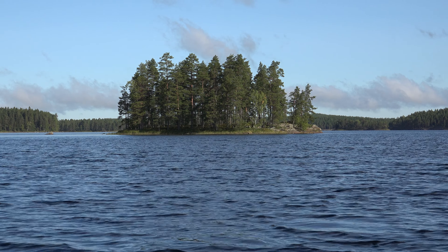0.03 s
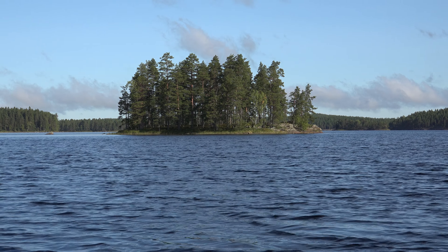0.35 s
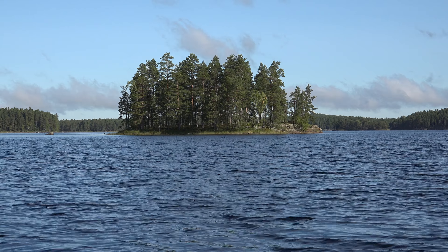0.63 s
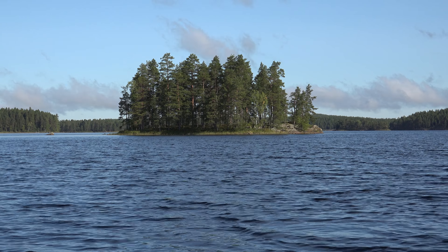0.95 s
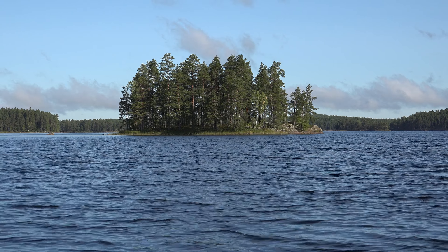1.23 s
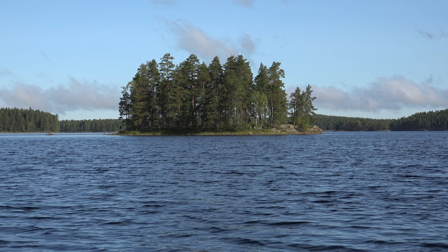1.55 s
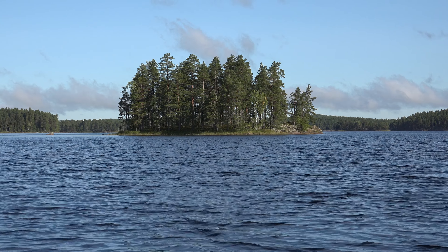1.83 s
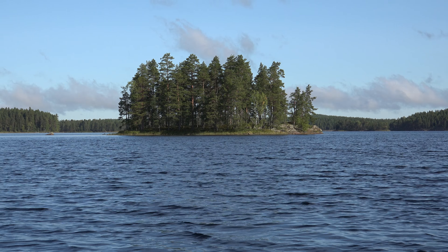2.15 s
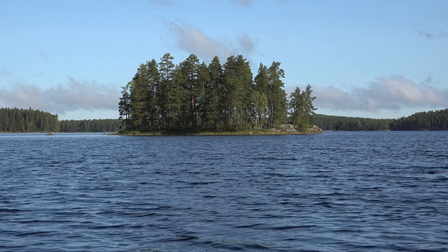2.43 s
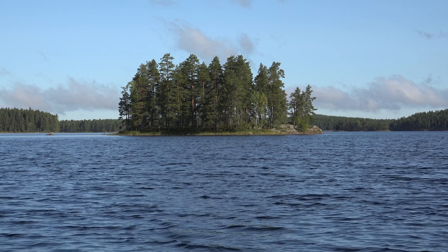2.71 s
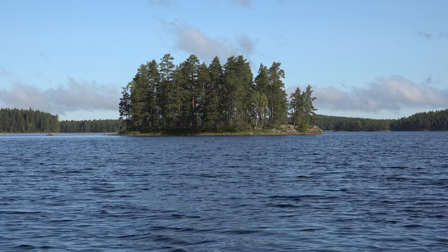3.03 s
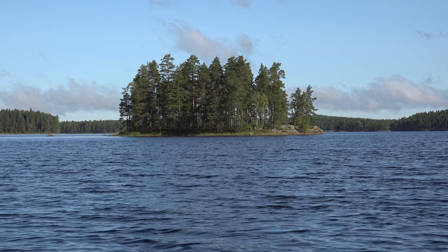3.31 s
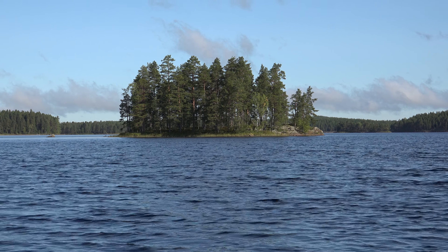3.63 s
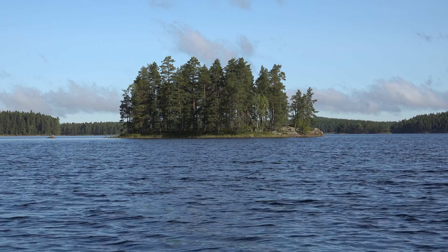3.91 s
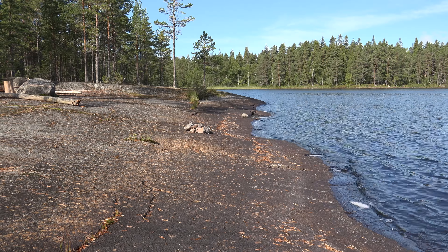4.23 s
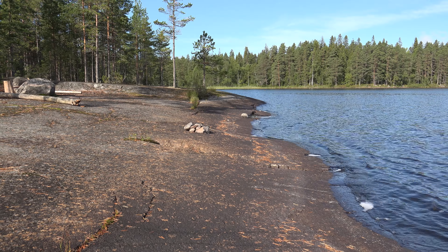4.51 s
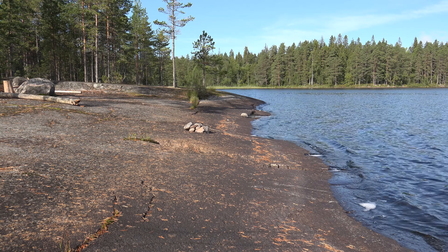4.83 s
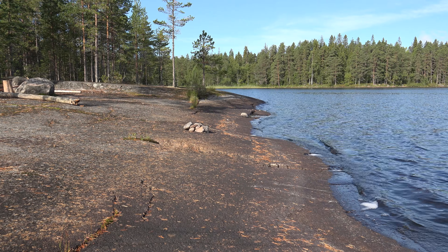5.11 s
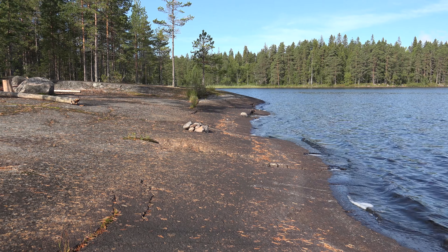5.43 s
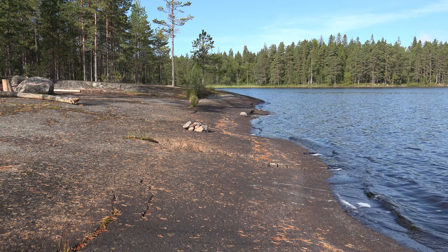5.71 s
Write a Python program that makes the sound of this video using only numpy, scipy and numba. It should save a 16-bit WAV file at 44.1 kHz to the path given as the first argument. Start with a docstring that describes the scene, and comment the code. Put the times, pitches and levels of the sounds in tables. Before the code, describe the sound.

Small waves lap against a rocky lake shore throughout, close to the microphone and slightly to the right. Each brings a bubbly gurgle, short slaps, rising glugs and a fine fizz of spray with occasional droplets. Wind rumbles and flutters on the microphone, leaning left, strongest in the first second and gusting again around 2.5 and 3.7 seconds. A faint, steady rush of open water lies behind. Distinct slaps come near 1.4, 2 and 2.7 seconds, with a run of glugs from 3.3 to 3.6 seconds. At about 4 seconds the sound shifts to a sheltered cove, where the wind becomes weaker and deeper and trees hiss faintly. The fullest splashing and gurgling comes between 4.1 and 4.6 seconds. A low glug follows at 4.8 and a small slap at 5.2, then a softer, hissier wash continues until about 6 seconds.

```python
"""Small waves lap on the bare rock shore of a lake, a little to the right of a stereo camera microphone.
Each wave traps air, which resonates: pockets slap and glide upward, small bubbles gurgle, spray crackles.
Wind eddies buffet the microphone ports over the faint rush of the lake. Near 4 s the scene changes
to a sheltered cove among trees, with less wind and a softer, hissier wash."""
import sys
import numpy as np
from scipy import signal
from scipy.fft import rfft, irfft
from scipy.io import wavfile
from scipy.ndimage import uniform_filter1d
from numba import njit

SR = 44100
rng = np.random.default_rng(int(sys.argv[2]) if len(sys.argv) > 2 else 0)


def to_wav(s):
    """Save 16-bit WAV."""
    ch = np.atleast_2d(s).T  # columns
    pcm = np.round(np.clip(ch, -1, 1) * 32767)  # PCM
    wavfile.write(sys.argv[1], SR, pcm.astype(np.int16))


N = 258426

CHANGE_S = 3.955  # from the exposed shore to the sheltered cove
LAG_MS, LAG_SPREAD_MS = 0.052, 0.036  # the right port hears the water first
# Waves running up the rock. Each row: arrival in seconds, time on the rock in seconds,
# relative gurgle level in dB, relative spray level in dB.
WAVES = [(0.018, 0.013, -43, -54), (.3, .38, -43, -57.5), (.8, 0.036, -53, -68), (1.179, .21, -42, -56.5),
         (1.84, 0.18, -42.5, -54), (2.05, 0.078, -50, -57.5), (2.36, 0.14, -52, -62.5),
         (2.609, 0.1, -41.5, -51.5), (2.8, 0.076, -42.5, -57), (3.255, 0.23, -39, -50.5),
         (3.77, 0.36, -42, -53.5), (4.147, 0.23, -39, -45.5), (4.42, 0.09, -40, -53.5),
         (4.6, 0.1, -48, -58), (4.8, 0.09, -40, -54.5), (4.96, 0.17, -46, -53.5), (5.16, .13, -42.5, -58.5),
         (5.37, 0.076, -47.5, -57), (5.5, 0.1, -47, -62), (5.82, 0.037, -48.5, -53)]


def undb(db):
    """Amplitude grows tenfold for every 20 dB."""
    return 10 ** (np.asarray(db) / 20)


def level(x, db=0):
    """Normalisation sets the rms level of the mean of both channels."""
    return x * undb(db) / np.sqrt(np.mean(x.mean(0) ** 2))


def steady(x, seconds):
    """Division by the running rms evens out slow swells; faster flicker stays."""
    power = uniform_filter1d(x.mean(0) ** 2, int(seconds * SR))
    return x / np.sqrt(power + 1e-9 * power.max())


def gain_at(hz, spectrum):
    """Interpolation on a log-frequency axis reads a gain from a spectrum."""
    points, db = np.transpose(spectrum)
    return undb(np.interp(np.log(hz + 1), np.log(points), db))


def by_place(exposed, sheltered):
    """A 10 ms crossfade leads from the exposed shore to the cove."""
    share = np.clip((np.arange(N) / SR - CHANGE_S) / .01 + .5, 0, 1)
    share = np.sin(np.pi / 2 * share) ** 2
    return (1 - share) * np.asarray(exposed) + share * np.asarray(sheltered)


def noise(spectrum, coherence, lag_ms=0):
    """Partly coherent noise: a share of its power is common to both ports, lag_ms later on the left."""
    hz = np.arange(N // 2 + 1) * SR / N
    common, *own = rfft(rng.standard_normal((3, N)))
    delay = np.array([np.exp(-2j * np.pi * hz * lag_ms / 1000), np.ones(len(hz))])
    mixed = np.sqrt(coherence) * common * delay + np.sqrt(1 - coherence) * np.array(own)
    return level(irfft(mixed * gain_at(hz, spectrum), N))


def distant_rush():
    """Many far sources add up to steady noise: first the open lake, then the trees."""
    # Spectra of the lake and the trees. Each row: frequency in Hz, relative density in dB.
    lake = [(100, -49), (400, -6), (1000, 3), (2000, -17), (4000, -21), (8000, -14.5), (12000, -21),
            (16000, -29)]
    trees = [(100, -16), (400, 6.5), (800, -1), (1500, -0.5), (2500, -18), (6000, -5.5), (12000, -7.5),
             (16000, -14)]
    return by_place(noise(lake, coherence=0.49, lag_ms=LAG_MS) * undb(-60.5),
                    noise(trees, coherence=0.59, lag_ms=LAG_MS) * undb(-59))


def wind(flutter_depth=0.14, lee_hz=62, overload=0.88):
    """Turbulent pressure: large eddies rumble at each port, small ones flutter with their pushes."""
    # Spectra of large and small eddies. Each row: frequency in Hz, relative density in dB.
    large_eddies = [(8, -20), (18, 4.5), (30, 1.5), (42, 0.5), (65, -6), (95, -13.5), (140, -30),
                    (250, -98)]
    small_eddies = [(45, -10), (80, 3), (115, 0.5), (180, -6), (260, -14.5), (400, -24), (700, -39),
                    (1500, -60.5)]
    # Gusts in each place. Each row: time in seconds, rumble level in dB, left minus right in dB.
    open_gusts = [(0, -10.5, 4), (.36, -16.5, 5.5), (.55, -12, 3.5), (.67, -19, 3), (.79, -15, 6.5),
                  (1.2, -24.5, 2), (1.6, -24, 7.5), (1.95, -22, 5.5), (2.25, -20.5, 4), (2.5, -14, 3.5),
                  (2.65, -23.5, 6), (3.1, -21.5, 2), (3.33, -17.5, 2), (3.6, -21, 4), (3.74, -15, 4),
                  (3.94, -16.5, 6.5)]
    cove_gusts = [(3.97, -20.5, -1), (4.1, -24.5, 0.5), (4.28, -24, 1.5), (4.54, -36, -1), (4.83, -29, 7.5),
                  (5.02, -28, 3), (5.17, -34.5, -7.5), (5.4, -29, 6.5), (5.7, -26.5, -2.5), (5.86, -30, 0)]
    t = np.arange(N) / SR
    places = map(np.transpose, (open_gusts, cove_gusts))
    courses = [[np.interp(t, s, db), np.interp(t, s, pan)] for s, db, pan in places]
    wind_db, pan_db = by_place(*courses)
    gust_db = wind_db + 19.5
    flutter_db = by_place(-28.5 + 0.31 * gust_db, -46.5 + 0.42 * gust_db)
    eddies = noise(large_eddies, coherence=0.085)
    lee = signal.sosfilt(signal.butter(2, lee_hz, fs=SR, output="sos"), eddies)  # weaker wind is deeper
    rumble = steady(by_place(eddies, lee), seconds=0.1234)
    push = np.abs(rumble.mean(0))
    flutter = steady(noise(small_eddies, coherence=0.85) * (1 + flutter_depth * push), seconds=0.14)
    sides_db = np.array([pan_db, -pan_db]) / 2
    pressure = rumble * undb(wind_db + sides_db) + flutter * undb(flutter_db + 0.63 * sides_db)
    return overload * np.tanh(pressure / overload)  # the microphone rounds off the hardest pushes


def shore_echo(x, t60=0.11, echo_db=-12):
    """Scattering from rock and ripples adds a short, exponentially decaying tail."""
    t = np.arange(SR // 4) / SR
    common, *own = rng.standard_normal((3, len(t)))
    tail = (common + 0.91 * np.array(own)) * np.exp(-np.log(1000) * t / t60)
    tail /= np.sqrt(np.sum(tail ** 2, axis=1, keepdims=True))
    return x + undb(echo_db) * signal.fftconvolve(x, tail, axes=1)[:, :N]


@njit
def ring(start, hz, cycles, size, lag, pan, rise):
    """Damped oscillators swell in about a cycle, then rise in pitch as they decay by 50 dB."""
    out = np.zeros((2, N))
    for k in range(len(start)):
        life = cycles[k] / hz[k]
        for ch in range(2):
            side = .5 - ch
            onset = start[k] + side * lag[k]
            for i in range(max(0, int(onset * SR) + 1), min(N, int((onset + life) * SR))):
                t = i / SR - onset
                swell = (1 - np.exp(-2 * t * hz[k])) ** 2 * np.exp(-5.75 * t / life)
                turns = hz[k] * t * (1 + rise * t / life / 2)
                out[ch, i] += size[k] * (1 + side * pan[k]) * swell * np.sin(2 * np.pi * turns)
    return out


def bubbles(start, hz, cycles, size, rise, scatter=0.88):
    """Bubbles strewn along the waterline each differ in delay and level between the ports."""
    lag_offset, pan_offset = scatter * rng.standard_normal((len(start), 2)).T
    lag_s = (LAG_MS + LAG_SPREAD_MS * lag_offset) / 1000
    pan = 0.11 + 0.12 * pan_offset
    return ring(start, hz, cycles, size, lag_s, pan, rise)


def swarm(spectrum, count, cycles, spread_db, rise, scatter):
    """Bubbles of all sizes ring at random times, with power-law strengths: many faint, a few strong."""
    when, pitch, strength, damping = rng.random((count, 4)).T
    low_hz, high_hz = spectrum[0][0], spectrum[-1][0]
    hz = low_hz * (high_hz / low_hz) ** pitch
    ring_cycles = cycles * 2 ** (2 * damping - 1)
    size = undb(-spread_db * np.log(strength + 0.036)) * gain_at(hz, spectrum) * hz / np.sqrt(ring_cycles)
    return bubbles(when * N / SR, hz, ring_cycles, size, rise, scatter)


def drops(cycles=24.):
    """Air entrainment: each falling drop leaves one tiny, bright bubble."""
    # Drops falling back. Each row: start in seconds, relative level in dB, pitch in Hz.
    impacts = [(.445, -30, 3460), (0.4938, -37, 4600), (.515, -32, 2140), (.629, -32.5, 6740),
               (.7943, -28.5, 7600), (.8594, -35.5, 3320), (1.409, -29, 6600), (1.8633, -34, 3400),
               (1.9734, -30.5, 3230), (2.715, -31, 7500), (3.5313, -29.5, 4300), (3.553, -34, 4900),
               (4.4342, -27, 2600), (4.9638, -22.5, 6340)]
    start, db, hz = np.array(impacts, float).T.copy()
    return bubbles(start, hz, np.full(len(start), cycles), undb(db + 5), rise=0.032, scatter=0.83)


def surge(levels_db, rise_db_per_s, build_db, fall_db_per_s, rest_db, delay_s=0):
    """Incoherent waves add in power, returned in dB: each rushes in, builds on the rock and drains."""
    t = np.arange(N) / SR
    power = undb(rest_db) ** 2
    for (start, length, *_), db in zip(WAVES, levels_db):
        age = t - start - delay_s
        approach = rise_db_per_s * np.maximum(-age, 0)
        approach += 6 * (age < -0.04)  # a 6 dB jump as the front touches the rock, 40 ms ahead
        climb = build_db * np.clip(1 - age / length, 0, 1)
        drain = fall_db_per_s * np.maximum(age - length, 0)
        same_place = (t < CHANGE_S) == (start < CHANGE_S)
        power = power + undb(db - approach - climb - drain) ** 2 * same_place
    return 10 * np.log10(uniform_filter1d(power, SR // 100))


def spray():
    """The finest bubbles resonate highest: they fizz and burst, and in the cove foam hisses too."""
    # Spectra of fizz, bursts and foam. Each row: frequency in Hz, relative density in dB.
    fizz_spectrum = [(1700, -2.5), (2600, -1.5), (4000, -5), (6000, -8), (9000, -15), (12000, -30),
                     (15500, -19)]
    tick_spectrum = [(4000, -2.5), (7000, -2.5), (10000, 1), (12500, -12), (15500, -31)]
    foam_spectrum = [(800, -8), (2000, 8.5), (3200, 2), (5000, -2), (8000, -9.5), (12000, -6.5),
                     (16000, -20)]
    *_, levels_db = np.transpose(WAVES)
    spray_db = surge(levels_db, rise_db_per_s=105, build_db=1.3, fall_db_per_s=143, rest_db=-67)
    fizz = swarm(fizz_spectrum, count=14000, cycles=32.4, spread_db=5.5, rise=0.39, scatter=1.0)
    fizz = steady(fizz, seconds=0.14) * undb(by_place(3.2, -0.59))
    ticks = level(swarm(tick_spectrum, count=2000, cycles=8.7, spread_db=6, rise=0.11, scatter=0.5))
    foam = noise(foam_spectrum, coherence=0.24, lag_ms=LAG_MS) * by_place(0, 0.97) * undb(-3)
    # bubbles go on bursting between the waves, so their ticks swell less
    return (fizz + foam) * undb(spray_db) + ticks * undb(0.68 * spray_db - 25)


def gurgle():
    """Air trapped by each wave resonates as a swarm of bubbles, just after the spray."""
    # Spectrum of the swarm. Each row: frequency in Hz, relative density in dB.
    spectrum = [(260, -15.5), (400, -1.5), (650, 2), (1050, -1), (1450, -2.5), (1850, -10), (2400, -14.5)]
    _, _, levels_db, _ = np.transpose(WAVES)
    gurgle_db = surge(levels_db, rise_db_per_s=85, build_db=4.5, fall_db_per_s=161, rest_db=-56.5,
                      delay_s=0.021)
    ringing = swarm(spectrum, count=4600, cycles=30.5, spread_db=4, rise=0.59, scatter=0.68)
    return steady(ringing, seconds=0.14) * undb(gurgle_db + 0.67)


def glugs(attack=0.043, fade=0.5, wobble=0.12, lag_ms=0.029):
    """A big pocket's resonance rises as it nears the surface, its loudness shaken by the water."""
    # Rising air pockets. Each row: start and length in seconds, first and last pitch in Hz,
    # relative level in dB.
    pockets = [(.003, 0.039, 712, 1445, -37.5), (.077, 0.053, 870, 1300, -38.5),
               (0.785, 0.032, 965, 1214, -43), (.831, 0.05, 770, 1230, -39),
               (1.292, 0.06, 688, 1024, -37.5), (1.753, 0.017, 1550, 2500, -38.5),
               (1.978, 0.066, 738, 1113, -33.5), (2.64, .053, 500, 690, -40.5),
               (3.145, .081, 620, 690, -44.5), (3.301, 0.052, 604, 827, -34), (3.33, .086, 403, 547, -36),
               (3.543, 0.039, 638, 1143, -26), (3.596, 0.048, 687, 1590, -32), (4.04, 0.059, 318, 367, -47),
               (4.175, .032, 430, 473, -34.5), (4.238, 0.059, 593, 805, -30.5),
               (4.244, 0.046, 325, 440, -38), (4.345, 0.054, 339, 418, -35), (4.364, 0.0297, 547, 880, -28),
               (4.391, .045, 480, 875, -35), (4.461, 0.094, 382, 1170, -39), (4.545, 0.052, 690, 1790, -36),
               (4.818, 0.058, 329, 450, -30.5)]
    out = np.zeros((2, N))
    t = np.arange(N) / SR - np.array([[lag_ms / 1000], [0]])
    shake = steady(noise([(20, -1), (150, -1), (400, -30), (2000, -100)], coherence=0.63), seconds=0.08)
    for start, length, first_hz, last_hz, db in pockets:
        span = slice(int(start * SR), int((start + length) * SR))
        progress = np.clip((t[:, span] - start) / length, 0, 1)
        bend = 1 + 0.91 * np.sqrt(last_hz / first_hz)  # the wider the glide, the more of it comes late
        turns = length * (first_hz * progress + (last_hz - first_hz) * progress ** bend / bend)
        swell = (1 - np.exp(-progress / attack)) * np.exp(-fade * progress) * np.sqrt(1 - progress ** 2)
        swell *= 1 + wobble * shake[:, span]
        out[:, span] += undb(db + 1.5) * swell * np.sin(2 * np.pi * turns)
    return out


def slaps(count=14, pitch_spread=0.278, cloud_db=-8, cloud_cycles=17, splash_db=-22):
    """A wave face closes on the rock: one main air pocket resonates amid smaller ones and spray."""
    # Closing wave faces. Each row: start and length in seconds, pocket pitch in Hz, level in dB.
    faces = [(0.074, .0056, 1320, -44), (0.109, 0.0063, 1480, -41), (0.259, 0.0058, 750, -38.5),
             (1.405, .011, 1513, -30), (1.406, .039, 820, -41), (1.805, .0088, 1520, -39.5),
             (1.834, 0.025, 1400, -35.5), (1.962, .011, 1120, -33), (1.984, .0052, 1380, -29),
             (1.992, .011, 703, -30.5), (2.031, .011, 1450, -36.5), (2.704, 0.01, 1050, -35),
             (2.716, 0.0079, 1435, -25.5), (2.727, 0.025, 1390, -46), (2.806, 0.012, 765, -41),
             (2.926, 0.015, 1400, -41), (3.405, .01, 1780, -36), (3.442, .021, 1120, -35.5),
             (3.488, 0.012, 860, -38), (3.509, 0.0078, 2100, -38), (3.547, .008, 813, -30.5),
             (3.559, .015, 1340, -32.5), (3.853, 0.0177, 910, -34.5), (4.18, 0.011, 1500, -36),
             (4.238, 0.026, 867, -31.5), (4.262, .018, 1025, -24.5), (4.343, 0.012, 1320, -30),
             (4.488, 0.0061, 1480, -30.5), (4.911, 0.0068, 1330, -41), (5.194, .012, 1210, -31),
             (5.517, .012, 883, -42), (5.832, 0.013, 2250, -42)]
    out = np.zeros((2, N))
    main = np.arange(count) == 0
    for onset, length, pocket_hz, db in faces:
        when, pitch, splash_pitch = rng.random(count), rng.standard_normal(count), rng.random(count)
        start = onset + length * when * ~main
        hz = pocket_hz * np.exp((pitch_spread * pitch - .12) * ~main)
        cycles = np.where(main, 1.8 * length * pocket_hz + 4, cloud_cycles)
        pockets = bubbles(start, hz, cycles, np.where(main, 1, undb(cloud_db)), rise=0.079, scatter=0.2)
        splash_hz = 2500 * 4.5 ** splash_pitch
        splash = bubbles(start, splash_hz, np.full(count, 6.), np.full(count, undb(splash_db)), rise=0.1)
        out += level(pockets + splash, db) * np.sqrt(length * SR / N)  # rms taken over the slap's length
    return out


def scene():
    """Superposition: the near water and its echo add to the distant rush and the wind."""
    water = shore_echo(gurgle() + spray() + slaps() + glugs() + drops())
    lean_right = undb([[-0.65], [0.65]])
    return water * lean_right + distant_rush() + wind()


def record(dry, fade_s=0.004, top_hz=15750):
    """Band limiting cuts the highest treble; a 4 ms fade-in avoids a click at the start."""
    fade_in = np.sin(np.pi / 2 * np.minimum(np.arange(N) / (fade_s * SR), 1)) ** 2
    return signal.sosfilt(signal.ellip(10, .2, 80, top_hz, fs=SR, output="sos"), dry * fade_in)


dry = scene()
out = record(dry)
to_wav(out)
```